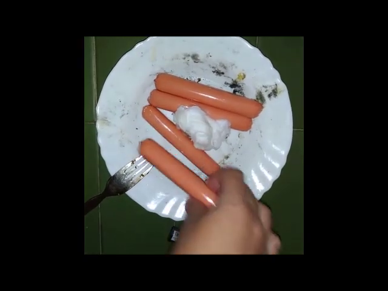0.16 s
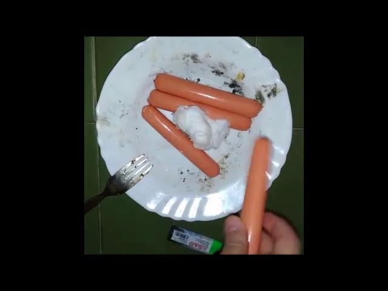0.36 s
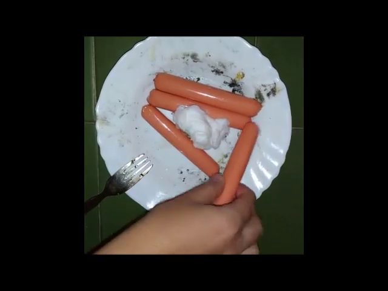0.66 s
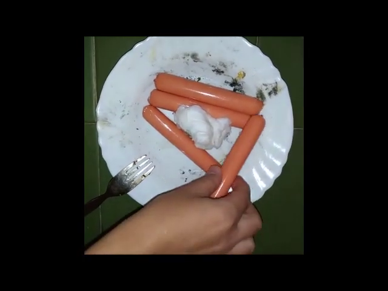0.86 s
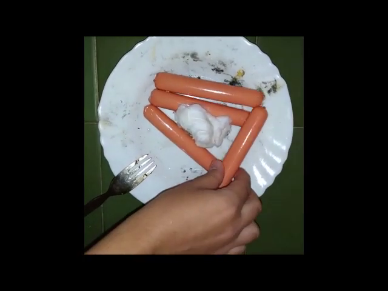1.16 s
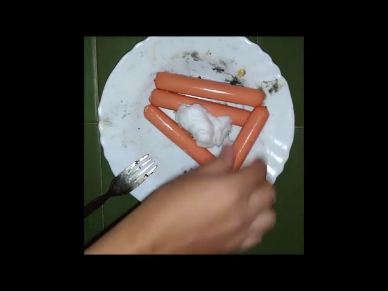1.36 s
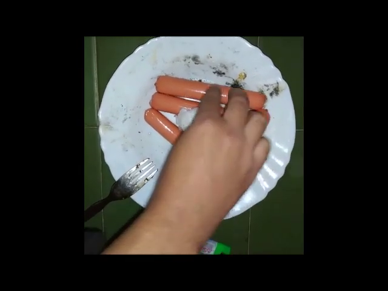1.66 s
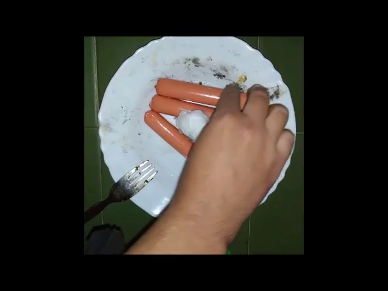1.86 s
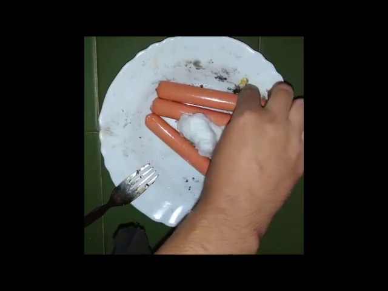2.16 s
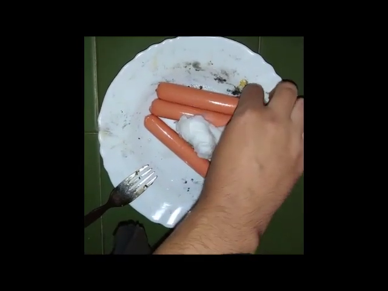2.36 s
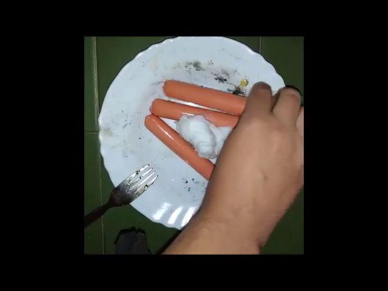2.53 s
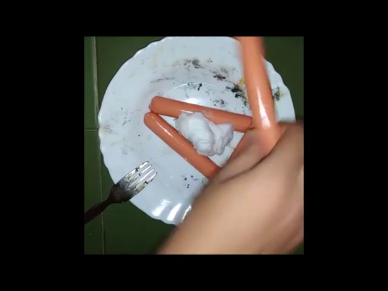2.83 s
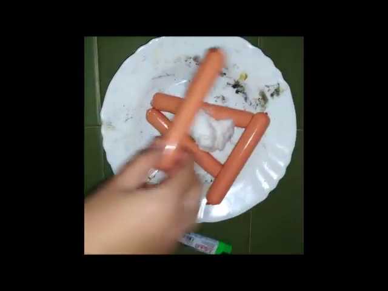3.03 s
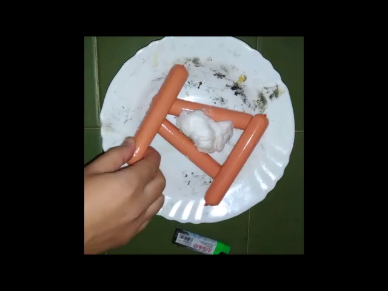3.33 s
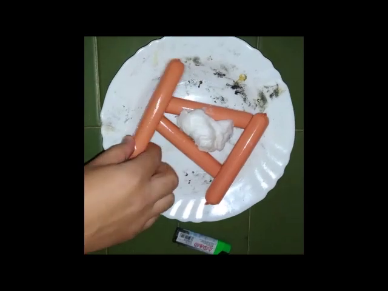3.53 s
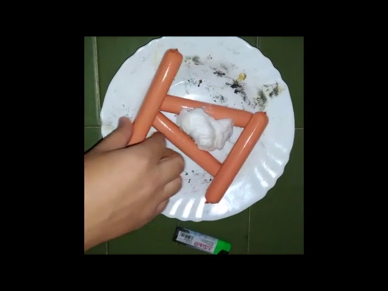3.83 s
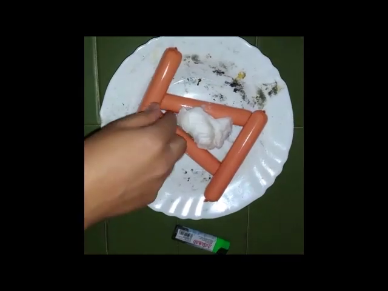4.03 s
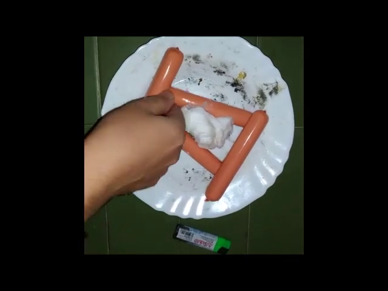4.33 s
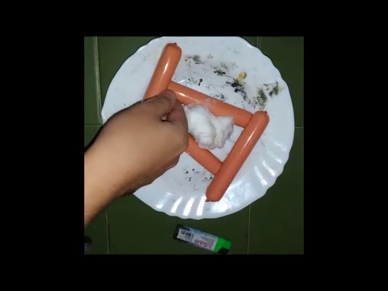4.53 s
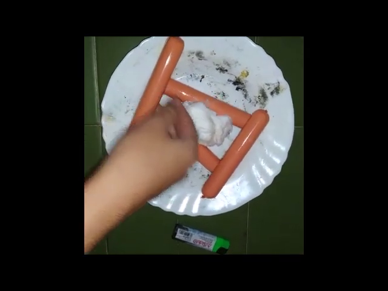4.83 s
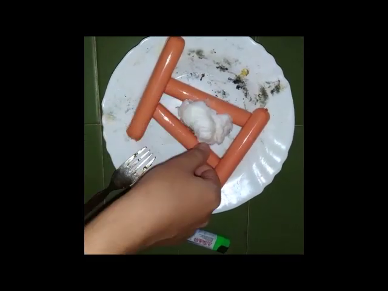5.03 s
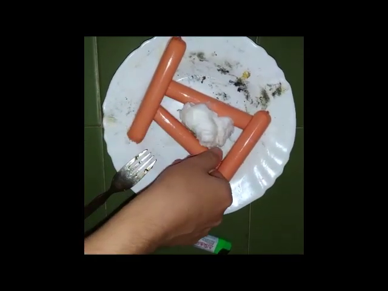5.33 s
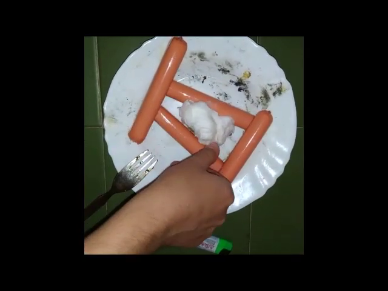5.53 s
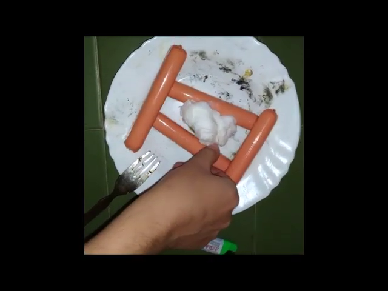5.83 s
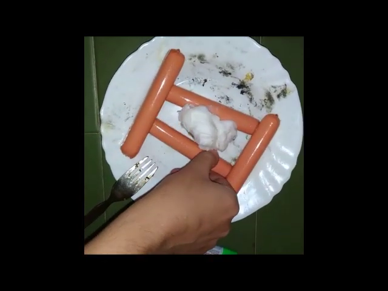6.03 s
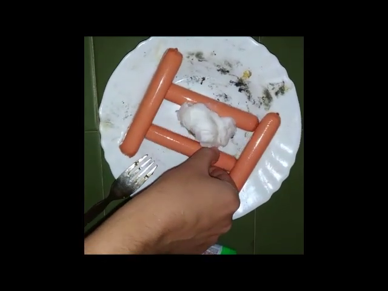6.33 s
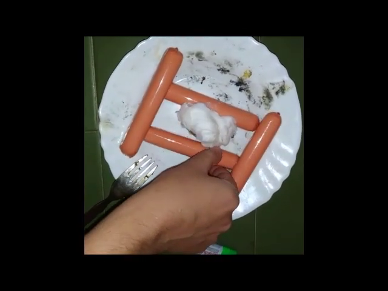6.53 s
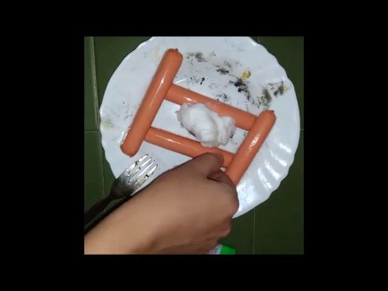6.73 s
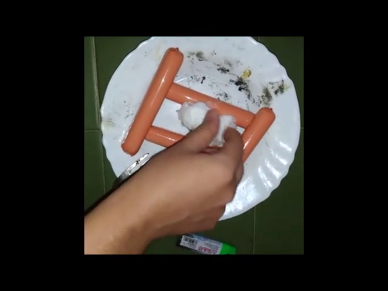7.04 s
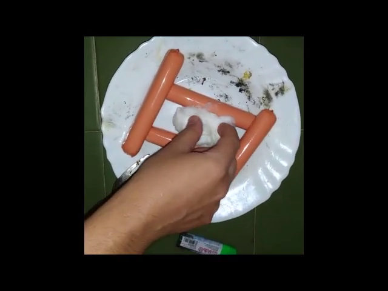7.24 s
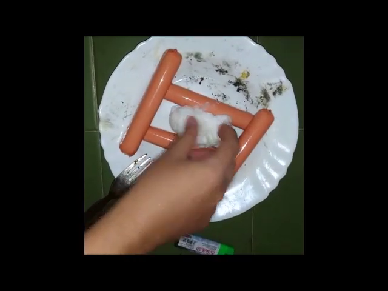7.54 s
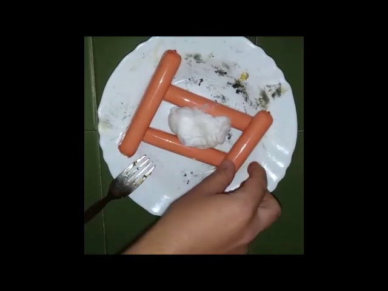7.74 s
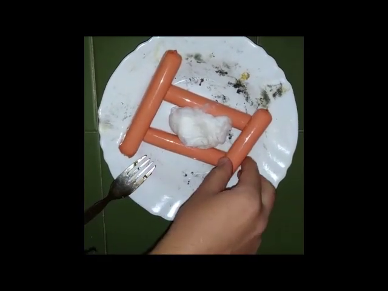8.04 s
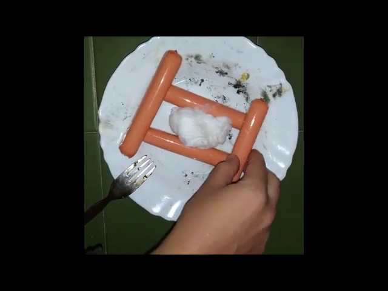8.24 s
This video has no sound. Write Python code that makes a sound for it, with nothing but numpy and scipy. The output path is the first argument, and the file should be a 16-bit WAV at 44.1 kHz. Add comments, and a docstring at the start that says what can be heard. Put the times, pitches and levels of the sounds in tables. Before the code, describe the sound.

A bright, grainy sizzle holds for about 8.4 seconds, swelling and fluttering unevenly, over a quiet low rumble and a faint hollow hum that rises now and then. A slight skin rustle comes at 0.35 s. Close by, a ceramic plate knocks on a hard surface: a quick cluster at 0.85 to 0.96, a pair around 1.3, then hits at 1.7, 1.95, a pair near 2.2, and 2.5. Each is a short hollow tock with small rebounds and a thin ceramic chatter. A soft rub falls at 1.8. Another knock lands at 3.4, a grainy rustle at 3.9, and a short stuttering groan of the plate foot at 4.65 to 4.75. Knocks follow at 5.55 and 5.87 with gentle rubbing to about 6.1. Mostly hiss remains until a double knock and rub at 7.85 to 7.95. Small tiled room echo, close stereo microphones.

```python
"""Sausages laid out on a ceramic plate

A steady sizzle of tiny random bursts hisses over a low rumble and a hum that swells now and then.
The plate tips and knocks on the hard top (struck damped modes), then its foot chatters (tiny contacts).
Skins rustle and rub (filtered grains); once the foot slides (stick-slip clicks into resonances).
A small tiled room echoes the plate; two closely spaced microphones hear it all."""
import sys
import numpy as np
from scipy import signal
from scipy.fft import rfft, irfft, next_fast_len
from scipy.io import wavfile
from scipy.ndimage import uniform_filter1d, minimum_filter1d

SR = 44100
rng = np.random.default_rng(int(sys.argv[2]) if len(sys.argv) > 2 else 0)


def transcribe(signal):
    """Save signal, clipped to [-1, 1], as a 16-bit WAV file at the path in sys.argv[1]."""
    frames = np.atleast_2d(signal).T
    limited = np.clip(frames, -1, 1)
    pcm = np.round(limited * 32767).astype(np.int16)
    wavfile.write(sys.argv[1], SR, pcm)


N = 369999
SIZE = next_fast_len(N)
TIME = np.arange(N) / SR
FREQS = np.maximum(np.fft.rfftfreq(SIZE, 1 / SR), 1)

# plate knocks: t/s, body modes 1 to 4 (four columns)/dB, clack/dB, rebound delay/s, rebound/dB, chatter/dB;
# levels relative, before the trims in knocks() and chatter()
KNOCKS = [(0.8453, -14, -17, -18, -32, -33, .002, -1.5, -16.5),
          (0.8905, -4.5, -8.5, -9, -12.5, -14.5, .003, -27, -18.5),
          (0.9582, -17, -36, -16, -27, -21, .0058, -8.5, -25),
          (1.264, -12.5, -11.5, -4.5, -13, -23, .0011, -3.5, -25.5),
          (1.3118, -15, -31, -18, -28, -34, 0.002, 2, -32),
          (1.716, -7.5, -2, -8, -20, -12.5, .0014, -2, -28),
          (1.9614, -21, -6, -12, -22.5, -26, 0.0019, -20, -54),
          (2.2122, -9, -6.5, -12.5, -21, -15.5, .0027, 0.5, -28.5),
          (2.2541, -40, -7, -11.5, -25, -31, 0.0023, -17, -46),
          (2.48, -13.5, -38, -5.5, -16.5, -17, .0032, -29, -23),
          (3.3671, -13, -11.5, -14.5, -28, -17.5, 0.00328, -2.5, -20),
          (5.55, -11.5, -36, -6.5, -19.5, -17.5, .002, 0.5, -17),
          (5.8683, -12, -18, -9, -15.5, -17.5, 0.002, -8, -20),
          (7.846, -8.5, -5, -11, -14, -15.5, 0.024, -8, -20),
          (7.9552, -10, -15.5, -9.5, -25, -19, 0.0021, -10, -18)]


def from_db(db):
    """Decibels to gain."""
    return 10 ** (np.asarray(db) / 20)


def rms_one(x):
    """Scale to unit rms."""
    return x / np.sqrt(np.mean(x ** 2) + 1e-20)


def in_time(rows):
    """Columns of a curve at every sample."""
    s, *columns = np.transpose(rows)
    return [np.interp(TIME, s, c) for c in columns]


def in_frequency(rows):
    """Columns of a spectrum at every bin, interpolated over log frequency."""
    hz, *columns = np.transpose(rows)
    return [np.interp(np.log(FREQS), np.log(hz), c) for c in columns]


def drift(rate):
    """Random curve of unit rms through `rate` new values per second."""
    return rms_one(np.interp(TIME * rate, np.arange(N), rng.standard_normal(N)))


def swell(s, length_s):
    """Gaussian rise and fall about a moment."""
    return np.exp(-2 * ((TIME - s) / length_s) ** 2)


def ring(clicks, hz, t60):
    """Two-pole resonator: a unit click starts a decaying sine of height about 1."""
    radius = from_db(-60 / (t60 * SR))
    angle = 2 * np.pi * hz / SR
    return signal.lfilter([0, np.sin(angle)], [1, -2 * radius * np.cos(angle), radius ** 2], clicks + 1e-18)


def band(x, low_hz, high_hz, order=2):
    """Causal band-pass."""
    sos = signal.butter(order, [low_hz, min(high_hz, .45 * SR)], "band", fs=SR, output="sos")
    return signal.sosfilt(sos, x)


def add(out, sound, s):
    """Mix a short sound in at a time."""
    i = int(s * SR)
    out[..., i:i + sound.shape[-1]] += sound[..., :N - i]


def grains(per_s, spread_db):
    """Random clicks of either sign and uneven size, at unit rms."""
    sizes = from_db(spread_db * np.minimum(rng.exponential(1, N), 5))
    present = rng.random(N) < per_s / SR
    return rms_one(present * sizes * rng.choice([-1, 1], N))


def in_stereo(source, colour):
    """Coloured source in stereo: a shared part with left leading in phase, a diffuse part per side."""
    # stereo image by band: f/Hz, coherence, left minus right/dB, left phase lead/rad
    pair = [(100, .94, .5, 0), (350, .9, .3, .05), (700, .7, -1.5, .1), (1400, .3, -3.5, .5),
            (2200, .35, -3, 2.1), (2750, .85, -.3, 3.0), (3100, .98, 0, 3.12), (3300, .999, 0, 3.14),
            (3720, .999, 0, 3.14), (3850, .95, 0, 3.2), (4100, .15, -.5, 3.5), (5700, .2, 1, 6.1),
            (6100, .4, 1, 6.2), (6300, .94, 1.2, 6.28), (6800, .94, 2.8, 6.28), (7800, .78, 7.5, 6.28),
            (9500, .6, 9.5, 6.28), (15000, .5, 9, 6.28)]
    alike, balance_db, lead_rad = in_frequency(pair)
    alike = np.clip(alike, 0, 1)
    sides = np.array([[.5], [-.5]])
    direct = np.sqrt(alike) * rfft(source, SIZE) * np.exp(1j * lead_rad * sides)
    diffuse = np.sqrt(1 - alike) * rfft(rng.standard_normal((2, N)), SIZE)
    spectrum = (direct + diffuse) * colour * from_db(balance_db * sides)
    return rms_one(irfft(spectrum, SIZE)[:, :N])


def patchy(x, patchy_db, low_hz, high_hz, turns_per_s):
    """Seven neighbouring bands each swell and fade a little by themselves."""
    log_hz, centres = np.log2(FREQS), np.log2(np.geomspace(low_hz, high_hz, num=7))
    spectrum = rfft(x, SIZE)
    out = 0
    for one in np.eye(len(centres)):
        share = np.interp(log_hz, centres, one)
        out = out + irfft(spectrum * share, SIZE)[:, :N] * from_db(patchy_db * drift(rate=turns_per_s))
    return out


def sizzle(flutter_db):
    """Thousands of tiny bursts a second, coming in slow waves and quick uneven flurries; treble flickers."""
    # main band before trim: t/s, level/dB
    main_level = [(0.0, -33), (0.02, -38), (0.35, -31), (0.54, -37.5), (0.98, -31), (1.54, -36),
                  (1.585, -27.5), (1.63, -27.5), (1.68, -34.5), (1.74, -34), (1.87, -32.5), (2.17, -39),
                  (2.48, -33), (2.76, -37.5), (3.46, -30.5), (3.74, -36), (3.92, -32), (4.18, -38),
                  (4.62, -33.5), (5.54, -35), (5.56, -32), (5.68, -33), (5.73, -33), (6.45, -34.5),
                  (6.56, -30), (6.61, -34.5), (7.03, -35.5), (7.22, -32), (7.28, -36), (7.5, -31.5),
                  (7.56, -35), (7.92, -33.5), (8.39, -34)]
    # top octave before trim: t/s, level/dB
    top_level = [(0.0, -53), (0.82, -51.5), (0.86, -40), (1.1, -50.5), (1.38, -41.5), (1.45, -56.5),
                 (1.73, -41), (1.98, -41.5), (2.1, -65), (2.19, -50.5), (5.23, -51.5), (5.49, -62),
                 (5.56, -35.5), (5.82, -53.5), (5.89, -35.5), (5.98, -53.5), (7.83, -51), (7.87, -39.5),
                 (8.2, -52), (8.39, -48)]
    # relative spectral density, mostly below 8 kHz: f/Hz, density/dB
    main_colour = [(400, -62), (1000, -13.5), (1800, -15.5), (2700, -4.5), (3700, -6), (4300, -1.5),
                   (5100, -2), (6200, -0.84), (7200, -0.5), (8000, -1.5), (8350, -34), (10000, -32.5)]
    # relative spectral density of the top: f/Hz, density/dB
    top_colour = [(7000, -8.5), (8300, -1.5), (9300, 4.5), (10700, 3.5), (11800, -5), (14000, -9),
                  (15800, -44)]
    # faint steady resonances: f/Hz, width/Hz, gain added to unity/dB
    whistles = [(4300, 20, 1), (5900, 16, 3)]
    main_trim_db, top_trim_db = 1.37, 1.5

    flurry_db = flutter_db * drift(rate=70) + 0.93 * drift(rate=9.9)
    bursts = grains(per_s=9000, spread_db=1.0)
    colour = from_db(in_frequency(main_colour)[0])
    for hz, width_hz, db in whistles:
        colour = colour * (1 + from_db(db) / (1 + (2 * (FREQS - hz) / width_hz) ** 2))
    hiss = from_db(in_time(main_level)[0] + main_trim_db) * in_stereo(bursts, colour)
    top = in_stereo(bursts, from_db(in_frequency(top_colour)[0]))
    top = from_db(in_time(top_level)[0] + top_trim_db) * top
    both = from_db(flurry_db) * (hiss + top)
    return patchy(both, patchy_db=1.8, low_hz=3000, high_hz=12000, turns_per_s=26)


def rumble():
    """Low background of the room: coloured noise, uneven from band to band."""
    # relative spectral density: f/Hz, density/dB
    rumble_colour = [(25, -46), (50, -29), (70, -24.5), (100, -3), (140, -11.5), (172, 2.5), (205, -6.5),
                     (240, 2.5), (265, -4.5), (295, 0.5), (360, 3), (430, -9.5), (490, -4.5), (730, -14),
                     (860, -3), (1000, -26), (1900, -10.5), (3000, -40)]
    noise = in_stereo(rng.standard_normal(N), from_db(in_frequency(rumble_colour)[0]))
    return patchy(from_db(-44.5) * noise, patchy_db=2.4, low_hz=90, high_hz=900, turns_per_s=9)


def rustle(s, length_s, db, hz):
    """Fingertips slip on a sausage skin in a short, grainy whisper: grains through one resonance."""
    skin = band(grains(per_s=3100, spread_db=8.0), low_hz=1800, high_hz=6000)
    return from_db(db) * swell(s, length_s) * rms_one(ring(skin, hz, t60=0.0052))


def hum(hz, t60):
    """A hollow, wavering low resonance fed by noise, swelling now and then."""
    # swells: t/s, length/s, level/dB
    hums = [(0.84, 0.08, -39), (1.33, 0.11, -38), (1.597, 0.085, -39.5), (3.256, 0.11, -48),
            (4.76, 0.12, -42.5), (5.16, 0.081, -43), (5.3, 0.1, -41), (7.621, 0.035, -37)]
    strength = sum(from_db(db) * swell(s, length_s) for s, length_s, db in hums)
    tone = ring(rng.standard_normal(N), hz, t60)
    return strength * rms_one(band(tone, low_hz=290, high_hz=417))


def body(force, modes_db, clack_db):
    """Damped plate: a hollow tock and a short clack; neighbouring modes swing in opposite senses."""
    # body modes of the loaded plate on the top: f/Hz, t60/s
    body_modes = [(870, 0.029), (1030, .019), (1240, 0.021), (1540, 0.052)]
    # short upper modes: f/Hz, level relative to clack_db/dB, t60/s
    clack_modes = [(1685, 1.5, 0.016), (2070, -4.5, .011), (2360, -12, 0.02)]
    modes = [(hz, db, t60) for (hz, t60), db in zip(body_modes, modes_db)]
    modes += [(hz, clack_db + db, t60) for hz, db, t60 in clack_modes]
    tock = sum((-1) ** k * from_db(db) * ring(force, hz, t60) for k, (hz, db, t60) in enumerate(modes))
    return band(tock, low_hz=570, high_hz=2760)


def knocks(level_db, settle_db, settle_s):
    """The foot lands, rebounds and settles in small contacts; each landing has its own mode levels."""
    out = np.zeros(N)
    age_s = TIME[:SR // 5]
    for s, *modes_db, clack_db, rebound_s, rebound_db, _ in KNOCKS:
        small = (rng.random(len(age_s)) < 3000 / SR) * rng.standard_normal(len(age_s))
        force = from_db(settle_db) * small * np.exp(-age_s / settle_s)
        force[0] += 1
        force[int(abs(rebound_s) * SR)] += from_db(rebound_db)
        add(out, from_db(level_db) * body(force, modes_db, clack_db), s)
    return out


def chatter(delay_s, swell_s, crack_db, ring_db, tock_db):
    """After each knock the foot buzzes: tiny hard contacts ring the ceramic and stir its body modes."""
    # ring of the ceramic: f/Hz, level before drift and ring_db/dB, t60/s
    ceramic = [(1528, -18.5, 0.084), (2433, -12.5, 0.013), (3060, -17.5, 0.03), (3530, -26, 0.017),
               (4280, -17.5, 0.055), (4410, -16.5, 0.058), (4820, -26, 0.031), (5170, -19.5, 0.035),
               (6040, -19, 0.037), (6340, -20, 0.025), (6770, -17, 0.016), (7125, -10, 0.021),
               (8450, -20.5, 0.018), (9950, -20.5, 0.014)]
    strength = np.zeros(N)
    age = TIME[:SR // 5] / swell_s
    for s, *_, chatter_db in KNOCKS:
        add(strength, from_db(chatter_db) * age * np.exp(1 - age), s + delay_s)
    contacts = strength * np.array([grains(per_s=3500, spread_db=4.0) for side in range(2)])
    # drift: each place of contact favours other modes
    rings = sum(from_db(db + 2.5 * drift(rate=8)) * ring(contacts, hz, t60) for hz, db, t60 in ceramic)
    tocks = body(contacts.mean(axis=0), modes_db=[2, 0, -3, -13], clack_db=4)
    cracks = band(contacts, low_hz=3930, high_hz=6600)
    return from_db(tock_db) * tocks + from_db(ring_db) * rings + from_db(crack_db) * cracks


def rub(s, length_s, db):
    """A sausage is nudged softly across the glaze: grains stir the plate's body modes."""
    stirred = body(grains(per_s=540, spread_db=0.0), modes_db=[0.5, -1.5, -2, -15], clack_db=-11)
    return from_db(db) * swell(s, length_s) * rms_one(stirred)


def slide(slips_per_s, unevenness, shift_db, grit_db):
    """The foot sticks and slips in a short groan that builds, catches and stops; grit scrapes briefly."""
    # resonances of the sliding foot: f/Hz, level before drift and levelling/dB, t60/s
    foot_modes = [(846, 3, 0.06), (940, 4, 0.047), (1260, 5.5, 0.032), (1510, -17, 0.047),
                  (1940, -10, 0.023), (2550, -13, 0.013)]
    # foot catches and jerks free: t/s, length/s, rise above the slide/dB
    catches = [(4.653, 0.016, 5.5), (4.678, 0.014, 5.5), (4.703, 0.0099, 3.5), (4.715, 0.0046, 6.5),
               (4.737, 0.01, 7)]
    peak_s, peak_db, rise_db_per_s, fall_db_per_s = 4.728, -24, 145, 281

    turns = np.cumsum(slips_per_s * np.exp(unevenness * drift(rate=460))) / SR
    slips = np.diff(np.floor(turns), prepend=0)  # one click per whole turn
    judder = sum(from_db(db + shift_db * drift(rate=60)) * ring(slips, hz, t60)
                 for hz, db, t60 in foot_modes)
    judder = band(judder, low_hz=820, high_hz=2540, order=3)
    even = judder / np.sqrt(uniform_filter1d(judder ** 2, size=900).clip(1e-9))
    grit = rms_one(band(grains(per_s=350, spread_db=1), low_hz=1280, high_hz=2650, order=3))
    grit = from_db(grit_db) * swell(s=4.703, length_s=0.067) * grit

    from_peak_s = TIME - peak_s
    level_db = peak_db + np.minimum(rise_db_per_s * from_peak_s, -fall_db_per_s * from_peak_s)
    level_db = level_db + sum(db * swell(s, length_s) for s, length_s, db in catches)
    moving = (from_peak_s > -0.11) & (from_peak_s < 0.07)
    return moving * (from_db(level_db) * even + grit)


def room(x, near_db, near_s):
    """Per port, a bounce off a near surface and one off a wall; a dense tiled-wall tail builds and dies."""
    t60_s, build_s, tail_db = 0.28, 0.017, -16
    wall_s, wall_db = .011, -14
    age_s = TIME[:SR // 2]
    tail = band(rng.standard_normal((2, len(age_s))), low_hz=200, high_hz=6600)
    tail = tail * from_db(-60 * age_s / t60_s) * np.clip(age_s / build_s, 0, 1)
    response = from_db(tail_db) * tail / np.sqrt(np.sum(tail ** 2) / 2)  # mean energy per port
    for side in range(2):
        response[side, int(near_s[side] * SR)] += from_db(near_db[side])
    response[:, int(wall_s * SR)] += from_db(wall_db)
    return x + signal.fftconvolve(x, response, axes=1)[:, :N]


def scene():
    """The plate close by and echoed by the room; sizzle, rumble and hum behind it."""
    # fingers brushing the skins: t/s, length/s, level/dB, centre f/Hz
    rustles = [(0.345, 0.032, -44, 2400), (3.866, 0.04, -34, 4550)]
    # sausages nudged across the glaze: t/s, length/s, level/dB
    rubs = [(1.788, 0.046, -31.5), (3.87, 0.31, -54), (5.618, 0.041, -32), (6.136, 0.11, -43.5),
            (7.91, 0.12, -36.5)]
    right_lag_s = 0.0001

    background = sizzle(flutter_db=1.5) + rumble() + hum(hz=355.0, t60=0.15)
    plate = sum(rustle(*row) for row in rustles)
    plate = plate + knocks(level_db=1.0, settle_db=-21.5, settle_s=0.013)
    plate = plate + sum(rub(*row) for row in rubs)
    plate = plate + slide(slips_per_s=170, unevenness=0.41, shift_db=4.5, grit_db=-38.5)
    plate = np.array([plate, np.interp(TIME - right_lag_s, TIME, plate)])
    plate = plate * from_db([[-.7], [.5]])
    plate = plate + chatter(delay_s=0.0029, swell_s=0.0073, crack_db=-5.0, ring_db=-13.5, tock_db=-37)
    plate = band(plate, low_hz=222, high_hz=16400)  # a small plate radiates little bass
    return room(plate, near_db=[-16, -8], near_s=[.0029, .0041]) + background


def held_excess_db(x, threshold_db, release_db_per_s):
    """Louder port's excess over a threshold: instant rise, linear fall in dB."""
    over_db = np.maximum(20 * np.log10(np.abs(x).max(axis=0) + 1e-9) - threshold_db, 0)
    return np.maximum.accumulate(over_db + release_db_per_s * TIME) - release_db_per_s * TIME


def gain_control(x, threshold_db, share, attack_s, release_db_per_s):
    """Above the threshold the gain sinks by a share of the excess, smoothed, then comes back."""
    held_db = held_excess_db(x, threshold_db, release_db_per_s)
    keep = np.exp(-1 / (attack_s * SR))
    return x * from_db(-share * signal.lfilter([1 - keep], [1, -keep], held_db))


def limiter(x, ceiling_db, release_db_per_s):
    """The gain ducks just ahead of each peak over the ceiling and recovers quickly."""
    held_db = held_excess_db(x, ceiling_db, release_db_per_s)
    return x * from_db(uniform_filter1d(minimum_filter1d(-held_db, size=61), size=61))


def record(dry):
    """The gain gives way to loud sounds, peaks are limited and the top is cut."""
    levelled = gain_control(dry, threshold_db=-8.5, share=0.51, attack_s=0.01, release_db_per_s=99)
    limited = limiter(levelled, ceiling_db=-3.0, release_db_per_s=900)
    low_pass = signal.ellip(10, .2, 80, 15500, fs=SR, output="sos")  # order, ripple/dB, stop/dB, cutoff/Hz
    return signal.sosfilt(low_pass, limited)


dry = scene()
out = record(dry)
transcribe(out)
```